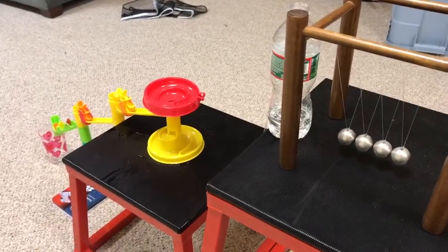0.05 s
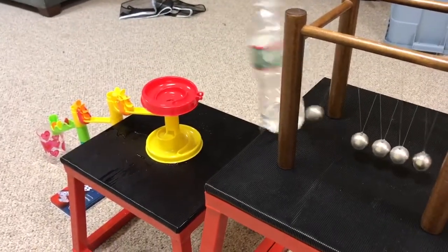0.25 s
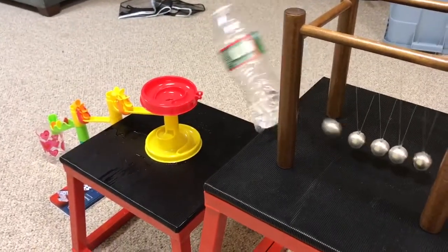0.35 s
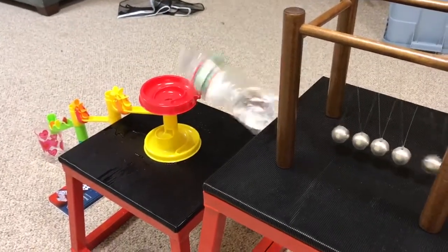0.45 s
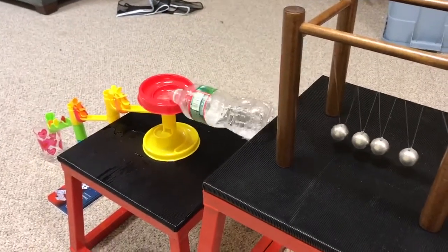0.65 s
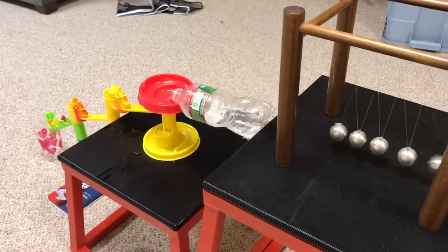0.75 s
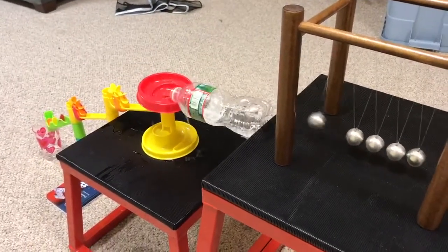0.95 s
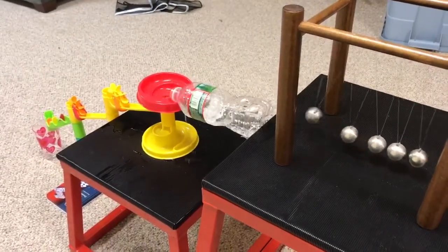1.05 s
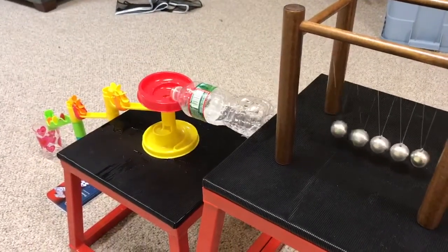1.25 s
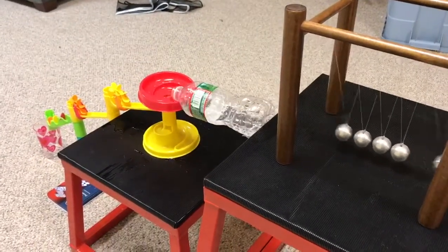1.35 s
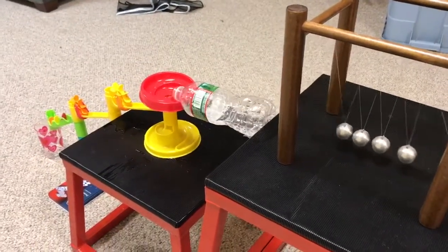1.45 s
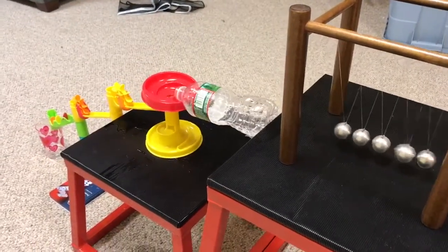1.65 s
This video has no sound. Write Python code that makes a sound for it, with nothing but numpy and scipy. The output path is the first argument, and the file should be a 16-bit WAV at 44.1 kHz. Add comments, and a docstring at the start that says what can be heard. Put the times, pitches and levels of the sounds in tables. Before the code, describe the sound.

Clicking metal pendulum balls, with a plastic water bottle knocked over onto a toy.

```python
"""Low hum and soft air in a carpeted room. A desk cradle of steel balls starts to clack.
Its first swing knocks over a plastic water bottle: the shell rattles, the water gulps.
The bottle bumps the table's edge and thuds onto a toy on a stool; both ring.
The water splashes and settles; the balls clack on in short groups, a faint tone comes and goes."""
import sys
import numpy as np
from scipy import signal
from scipy.fft import rfft, irfft
from scipy.io import wavfile
from scipy.ndimage import uniform_filter1d

SR = 44100
rng = np.random.default_rng(int(sys.argv[2]) if len(sys.argv) > 2 else 0)


def output_pcm(signal):
    """Save a mono or channel-first signal as 16-bit PCM at the path in sys.argv[1].

    Samples are clipped to [-1, 1] before scaling.
    """
    pcm = np.clip(np.atleast_2d(signal).T, -1, 1) * 32767
    wavfile.write(sys.argv[1], SR, np.round(pcm).astype(np.int16))


N = 74970

# Room air spectrum, hum partials: f/Hz, level/dB
AIR_SPECTRUM = [(15, -56), (25, -33.5), (49, -16), (92, -15.5), (127, -1.5), (242, -11.5), (263, -18.5),
                (293, -5.5), (373, -25), (405, -24), (607, -23), (796, -25), (1260, -25.5), (8360, -42.5),
                (16000, -52)]
HUM_PARTIALS = [(59.2, -72), (129, -70.5), (177, -65), (237, -70.5), (291, -75.5), (354, -75.5), (412, -75)]
# Envelopes of air, hum, faint ringing: t/s, level/dB
AIR_ENVELOPE = [(0, 0.5), (.2, -0.5), (.8, 1), (1.15, 1.5), (1.7, 0.5)]
HUM_ENVELOPE = [(0, -5.5), (.25, 0), (.8, -6), (1.05, -0.5), (1.3, -2), (1.7, -1.5)]
RINGING_ENVELOPE = [(0, -85), (.95, -78.5), (1.05, -69.5), (1.13, -86.5), (1.19, -71), (1.26, -66.5),
                    (1.32, -86), (1.38, -75), (1.46, -87), (1.7, -87)]
# Ball impacts: t/s, level/dB, row transit/s, later contacts/0-1, tilt/(dB/oct), knock/dB
CLACKS = [(0.2159, -37.5, 0.00038, 0.8, -12.5, -1.5), (0.2278, -46, 0.00028, 0.7, -2, 4.5),
          (0.2387, 3, 0.00093, 0, 0.5, 7), (.4741, -9, 0.00022, 0, 0, -2.5),
          (0.4914, -13.5, 0.00039, 0.8, -4.5, -8), (0.4912, -15.5, 0.00027, 1, 2.5, 1),
          (0.504, -10, 0.00034, 0.63, 3, -12), (0.8891, -13.5, 0.00037, 0.38, -2.5, -7),
          (0.9169, -9.5, 0.00038, 0.07, 2.5, 0), (0.9274, -12, 0.00034, 0, 0.5, -4),
          (.9295, -8.5, 0.00034, 0.07, 1.5, -3.5), (0.9836, -26.5, .0007, 0.14, 1, 7),
          (0.9975, -20, .0006, 1, -5, -7), (1.0225, -25.5, 0.00048, .9, -5, -3.5),
          (1.193, -45, .0003, 0.6, -4.5, 4.5), (1.203, -45, 0.00033, 0.28, -6.5, 3),
          (1.3104, -16.5, 0.00018, 0, 0, 2), (1.342, -13, 0.00054, 0.27, -1, -5),
          (1.3513, -9, 0.00066, 1, 1, -3), (1.4098, -28, .0002, 0.08, -3, 4),
          (1.4325, -24, 0.00051, 1, 1, 1), (1.4413, -24, 0.00027, 0.52, -2.5, 3.5),
          (1.5274, -38.5, 0.00021, .15, -7.5, 1.5), (1.616, -52.5, 0.00031, 0.25, -2.5, 2.5)]
# Spectra of ball contact, frame scatter, clack in the room: f/Hz, level/dB
BALL_SPECTRUM = [(100, -48.5), (400, -49.5), (1000, -31.5), (1500, -24.5), (2300, -13), (4500, -13),
                 (7000, -3.5), (9200, 3), (10700, -2.5), (12500, 2), (14200, -19), (16000, -27.5)]
FRAME_SPECTRUM = [(400, -42.5), (1200, -19.5), (2400, -6), (3700, 1), (4700, -6), (5800, 0.5),
                  (7500, -12.5), (9300, -7), (12000, -9), (16000, -25.5)]
BALL_ROOM_SPECTRUM = [(400, -26), (1200, -15), (2400, 0.5), (4500, -1), (6000, 6), (7500, 0), (9000, 0.5),
                      (10500, -11.5), (13000, -12.5), (16000, -19)]
# Blows to the bottle: t/s, level/dB, tilt/(dB/oct), dent f/Hz, dent gain/dB, t60/s
BOTTLE_BLOWS = [(.2852, -0.5, 1.5, 3920, 15.5, 0.015), (0.2879, -6.5, -4, 1204, 2.5, 0.063),
                (.2937, -5, 4.5, 5930, 7.5, 0.032), (.2960, -7.5, 4, 3030, 2.5, 0.016),
                (.2988, -13, 2.5, 9170, 11.5, .008), (.3015, -7.5, 2, 2193, 6, 0.031),
                (.3148, -5.5, 2.5, 5500, 7, 0.018), (.5689, 7, -1, 7000, 12.5, 0.013),
                (.5705, 4, -3, 2980, 9, 0.037), (.5752, 0.5, 1, 3200, 6.5, 0.035),
                (.5888, -2, 5.5, 3540, 6.5, 0.016), (.5982, -5, 1.5, 1838, -3, 0.0056),
                (.6128, -5, -0.5, 2000, 1.5, 0.012), (.6150, -4, -4, 522, 5.5, 0.051)]
# Shell spectrum and its room send: f/Hz, level/dB
SHELL_SPECTRUM = [(25, -43), (60, -22), (140, -21), (260, 2.5), (480, -6), (750, 2), (1200, 1), (2500, 1),
                  (5000, -8), (9000, -12.5), (13000, -13), (16000, -22)]
SHELL_ROOM_SEND = [(100, -8.5), (300, -5), (800, -13.5), (2500, -14.5), (6000, -15.5), (14000, -16)]
# Air pockets in the water: t/s, f/Hz, level/dB, swell/s, t60/s, relative glide/(1/s)
BUBBLES = [(0.305, 258.8, -30.5, 0.025, 0.073, 0.012), (.300, 299.8, -34.5, 0.031, 0.11, 0.011),
           (.41, 256, -54.5, 0.028, 0.41, 0.01), (.818, 1655, -55, 0.0042, 0.063, 8.2),
           (0.831, 80, -53, 0.017, 0.074, .01), (0.864, 134.2, -52, 0.031, 0.16, .01),
           (.8812, 2920, -42, 0.00046, 0.011, 3.4), (1.017, 672, -57, 0.003, 0.044, 1.6)]
# Light plastic contacts: t/s, level/dB, tilt/(dB/oct)
TICKS = [(.4400, -31, -2), (0.4841, -11.5, -4), (.5422, -13, 1.5), (0.5585, -24.5, -4.5), (.5621, -17, -3),
         (0.6284, -10, 21), (0.6346, -15, 3), (.6360, -27, 9), (.6527, -37, -2), (0.7144, -20, 0.5),
         (0.7847, -42, 6), (.8387, -37.5, 1), (0.854, -40, 1)]
# Tick spectrum and its room send: f/Hz, level/dB
TICK_SPECTRUM = [(100, -30.5), (550, -32), (1000, -3), (1600, -11.5), (2300, -1), (3600, 6.5), (5200, -1.5),
                 (7800, -2), (10500, -8.5), (13500, -6), (16000, -26)]
TICK_ROOM_SEND = [(300, -6), (3000, -10.5), (8000, -13), (14000, -17.5)]
# Bottle's landing and bounce: t/s, level/dB
LANDINGS = [(0.5697, -1.5), (0.6141, -14.5)]
# Modes of toy and stool: f/Hz, level/dB, t60/s
STOOL_MODES = [(228.5, -29, 0.48), (265.5, -31.5, 0.094), (292, -22, 0.095), (381.7, -35, 0.31),
               (392, -33, 0.29), (552, -44.5, .2), (668, -39.5, 0.12), (707, -37, .2), (812, -36, 0.11),
               (929, -36, 0.24), (1206, -30, 0.19), (1791, -30.5, .12), (2660, -34, .08), (3330, -29, .08)]
# Splash in the fallen bottle: t/s, level/dB
SPLASH_ENVELOPE = [(.66, -102), (.74, -71), (.80, -65), (.86, -68), (.92, -73), (1.08, -76.5), (1.2, -90)]
# Drop spectrum: f/Hz, level/dB
DROP_SPECTRUM = [(200, -31), (900, -4.5), (2500, 2.5), (5000, -4), (8500, -6), (12000, -9), (16000, -21.5)]
# Room decay: f/Hz, t60/s
ROOM_DECAY = [(150, .40), (500, .36), (1500, .29), (4000, .28), (8000, .28), (11000, .23), (15000, .18)]
# Early reflections: t/s, level/dB
ECHOES = [(.0053, -9.5), (.0112, -12), (.0135, -19), (.0228, -11), (.0282, -6.5)]

TAPS = 4096  # impact length in samples
GRID_HZ, GRID_S = np.fft.rfftfreq(TAPS, 1 / SR), np.arange(TAPS) / SR


def amp(db):
    """dB to gain."""
    return 10 ** (np.asarray(db) / 20)


def unit(x):
    """Scale to energy 1."""
    return x / np.sqrt(np.sum(x ** 2) + 1e-20)


def add(mix, at_s, sound):
    """Mix in place at a time."""
    part = mix[max(round(at_s * SR), 0):][:len(sound)]
    part += sound[:len(part)]


def envelope(points):
    """Gain curve from (t/s, level/dB)."""
    return amp(np.interp(np.arange(N) / SR, *np.transpose(points)))


def lookup(points, hz=GRID_HZ):
    """Interpolate a table over log frequency."""
    points_hz, values = np.transpose(points)
    return np.interp(np.log(hz + 1), np.log(points_hz + 1), values)


def coloured(x, points):
    """Filter by (f/Hz, level/dB)."""
    gain = amp(lookup(points, np.fft.rfftfreq(2 * N, 1 / SR)))
    return irfft(rfft(x, 2 * N) * gain)[:N]


def tilted(points, db_per_oct):
    """Spectrum in dB, tilted about 1 kHz."""
    return lookup(points) + db_per_oct * np.log2(np.maximum(GRID_HZ, 250) / 1000)


def bell(hz, width_oct):
    """Gaussian of height 1 over log frequency."""
    return np.exp(-.5 * (np.log2((GRID_HZ + 1) / hz) / width_oct) ** 2)


def pulse(spectrum_db):
    """Minimum-phase click, energy 1."""
    log_gain = np.log(amp(np.r_[spectrum_db, spectrum_db[-2:0:-1]]))
    spectrum = np.exp(np.conj(signal.hilbert(log_gain)))
    return unit(np.fft.ifft(spectrum).real)


def whitened(x, width_bins):
    """Flatten the broad spectrum, keep the fine ripple."""
    power = abs(rfft(x, 2 * TAPS)[::2]) ** 2
    smooth_db = 10 * np.log10(abs(uniform_filter1d(power, size=width_bins)) + 1e-9)
    return unit(signal.fftconvolve(x, pulse(-smooth_db))[:TAPS])


def ring(spectrum_db, t60_s):
    """Dense modes with one decay time, as shaped noise."""
    decay = rng.standard_normal(TAPS) * 1e-3 ** (GRID_S / t60_s)
    return unit(signal.fftconvolve(whitened(decay, width_bins=61), pulse(spectrum_db))[:TAPS])


def tone(hz, db, swell_s, t60_s, glide_per_s=0):
    """One resonance: linear swell, exponential decay."""
    t = np.arange(SR // 2) / SR
    fade_db = -60 * np.maximum(t - swell_s, 0) / t60_s
    phase = 2 * np.pi * hz * t * (1 + glide_per_s * t / 2)
    return amp(db + fade_db) * np.minimum(t / swell_s, 1) * np.sin(phase)


def wavering(hz, knots, depth):
    """Tone drifting at random in level and phase, rms 1."""
    t = np.arange(N) / SR
    offsets = rng.standard_normal(knots) + 1j * rng.standard_normal(knots)
    drift = np.interp(t, np.linspace(0, t[-1], knots), offsets)
    return unit(((1 + depth * drift) * np.exp(2j * np.pi * hz * t)).real) * np.sqrt(N)


def room(x, build_s=.012):
    """Early reflections and a tail that builds, then dies faster in the treble."""
    t = np.arange(SR // 2) / SR
    hz, frame_s, noise = signal.stft(rng.standard_normal(len(t)), SR, nperseg=256)
    decay = 1e-3 ** (frame_s / lookup(ROOM_DECAY, hz)[:, None])
    tail = signal.istft(noise * decay, SR, nperseg=256)[1][:len(t)]
    response = unit(tail * np.minimum(t / build_s, 1))
    for at_s, db in ECHOES:
        add(response, at_s, amp([db]))
    return signal.fftconvolve(x, response)[:N]


def background(air_db=-63.5, ringing_hz=815, hiss_db=-81.5):
    """Soft room air, wavering hum, faint ringing, even hiss."""
    air = amp(air_db) * unit(coloured(rng.standard_normal(N), AIR_SPECTRUM)) * np.sqrt(N)
    hum = sum(amp(db) * wavering(hz, knots=30, depth=0.4) for hz, db in HUM_PARTIALS)
    ringing = envelope(RINGING_ENVELOPE) * wavering(ringing_hz, knots=90, depth=0.82)
    hiss = amp(hiss_db) * rng.standard_normal(N)
    return envelope(AIR_ENVELOPE) * air + envelope(HUM_ENVELOPE) * hum + ringing + hiss


def cradle(frame_delay_s=.0003, frame_db=-4.5, room_db=-11):
    """Each clack crosses the row of balls as four quick contacts; the frame scatters it."""
    direct, send = np.zeros((2, N))
    for at_s, db, transit_s, later_gain, tilt, knock_db in CLACKS:
        contacts = np.zeros(256)
        contacts[0] = 1
        for fraction in (np.arange(1, 4) + rng.uniform(-.25, .25, 3)) / 3:
            add(contacts, fraction * transit_s, np.array([later_gain]))
        contacts = whitened(contacts, width_bins=301)
        knock_band_db = knock_db * bell(hz=2980, width_oct=0.42)
        click = pulse(tilted(BALL_SPECTRUM, tilt) + knock_band_db)
        scatter = ring(tilted(FRAME_SPECTRUM, tilt) + knock_band_db, t60_s=.008)
        add(click, frame_delay_s, amp(frame_db) * scatter)
        add(direct, at_s, amp(db) * unit(signal.fftconvolve(click, contacts)))
        room_click = pulse(tilted(BALL_ROOM_SPECTRUM, tilt) + knock_band_db / 2)
        add(send, at_s, amp(db) * unit(signal.fftconvolve(room_click, contacts)))
    return direct + amp(room_db) * room(send)


def bottle(snap_db=-13):
    """The thin shell snaps and rattles at each blow, damped by the water."""
    out = np.zeros(N)
    for at_s, db, tilt, dent_hz, dent_db, t60_s in BOTTLE_BLOWS:
        spectrum_db = tilted(SHELL_SPECTRUM, tilt) + dent_db * bell(dent_hz, width_oct=0.24)
        blow = amp(snap_db) * pulse(spectrum_db) + ring(spectrum_db, t60_s)
        add(out, at_s, amp(db) * unit(blow))
    return out + room(coloured(out, SHELL_ROOM_SEND))


def bubbles(room_db=-15.5):
    """Air pockets ring: a deep gulp as the bottle tips, then sloshes and small bubbles."""
    out = np.zeros(N)
    for at_s, *bubble in BUBBLES:
        add(out, at_s, tone(*bubble))
    return out + amp(room_db) * room(out)


def ticks(ring_db=-1):
    """Bottle and toy touch lightly before and after the landing."""
    out = np.zeros(N)
    for at_s, db, tilt in TICKS:
        spectrum_db = tilted(TICK_SPECTRUM, tilt)
        tick = pulse(spectrum_db) + amp(ring_db) * ring(spectrum_db, t60_s=.009)
        add(out, at_s, amp(db) * unit(tick))
    return out + room(coloured(out, TICK_ROOM_SEND))


def stool(swell_s=0.0036, room_db=-17):
    """Toy and stool ring as the bottle lands and bounces."""
    out = np.zeros(N)
    thud = sum(tone(hz, db, swell_s, t60_s) for hz, db, t60_s in STOOL_MODES)
    for at_s, db in LANDINGS:
        add(out, at_s, amp(db) * thud)
    return out + amp(room_db) * room(out)


def splash(drops_per_s=4500, spread_db=2.5, room_gain=.7):
    """Fine drops patter inside the shell."""
    sizes = amp(spread_db * np.minimum(rng.exponential(1, N), 5)) * rng.choice([-1, 1], N)
    hits = rng.random(N) < drops_per_s / SR
    drops = coloured(sizes * hits, DROP_SPECTRUM)
    return envelope(SPLASH_ENVELOPE) * unit(drops + room_gain * room(drops)) * np.sqrt(N)


def scene():
    """Mono sum of all sources."""
    return (background() + cradle() + bottle() + bubbles() + ticks() + stool() + splash())[None]


def record(dry):
    """Band limit: linear-phase low-pass."""
    cutoff_hz = 16200
    lowpass = signal.firwin(255, cutoff_hz, window=("kaiser", 9), fs=SR)
    return signal.oaconvolve(dry, lowpass[None], "same")


dry = scene()
out = record(dry)
output_pcm(out)
```